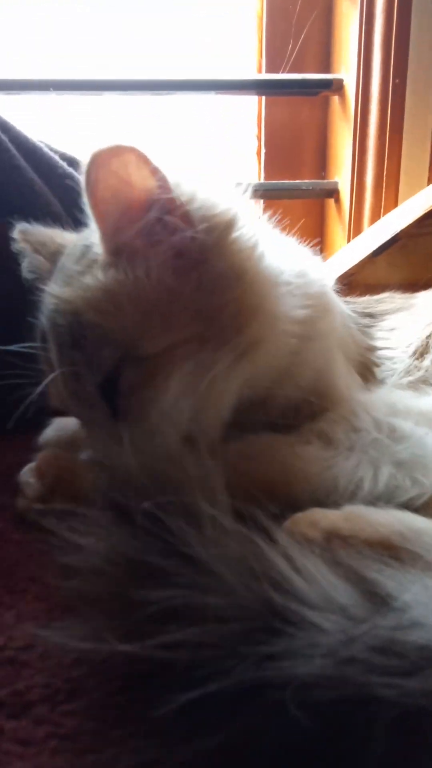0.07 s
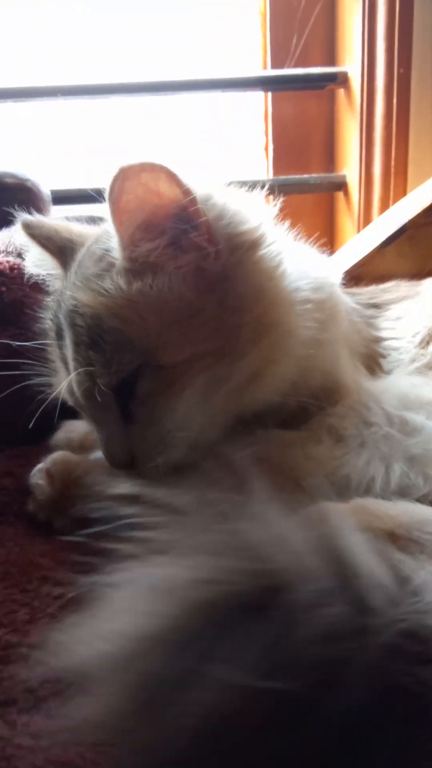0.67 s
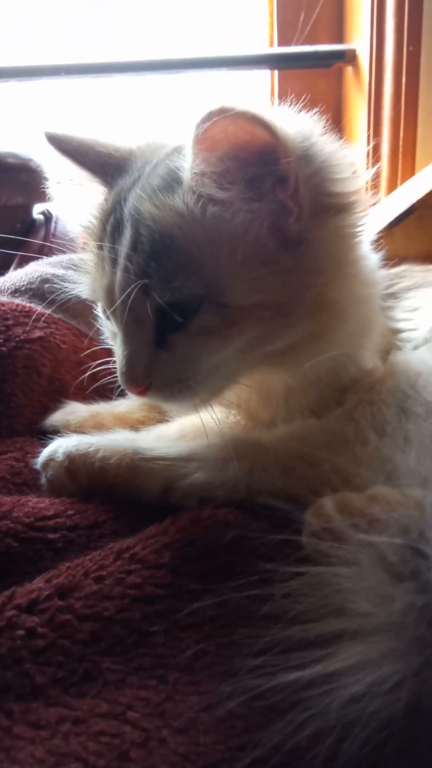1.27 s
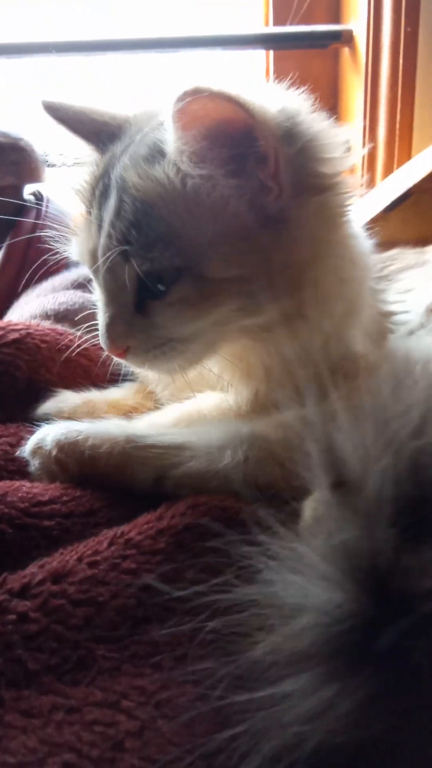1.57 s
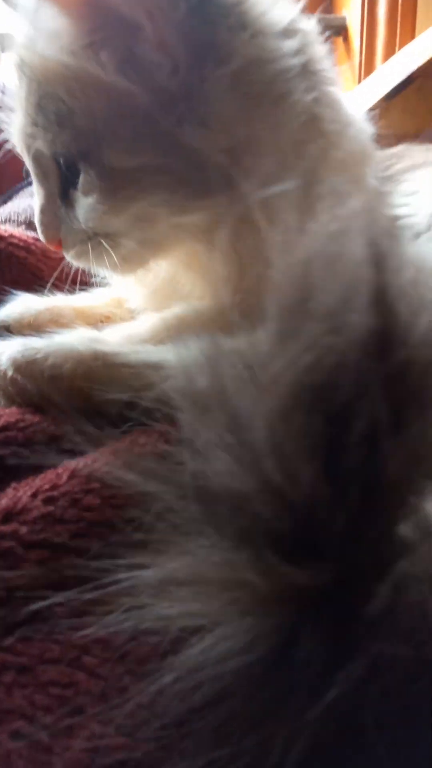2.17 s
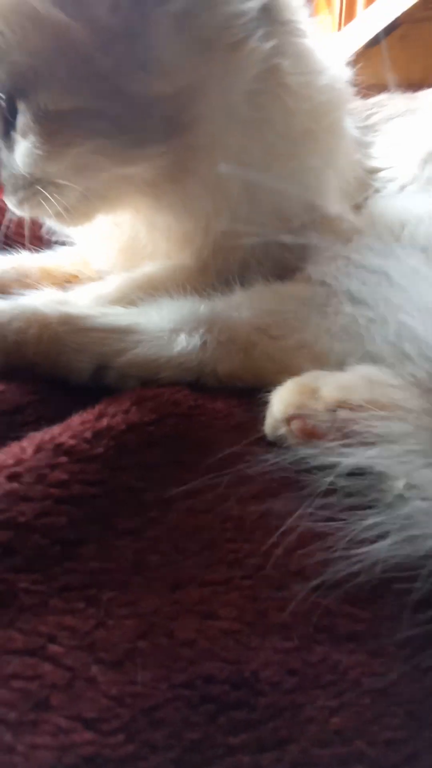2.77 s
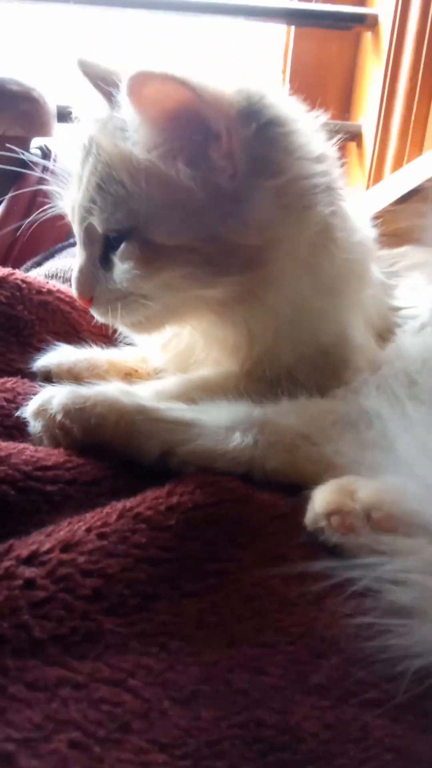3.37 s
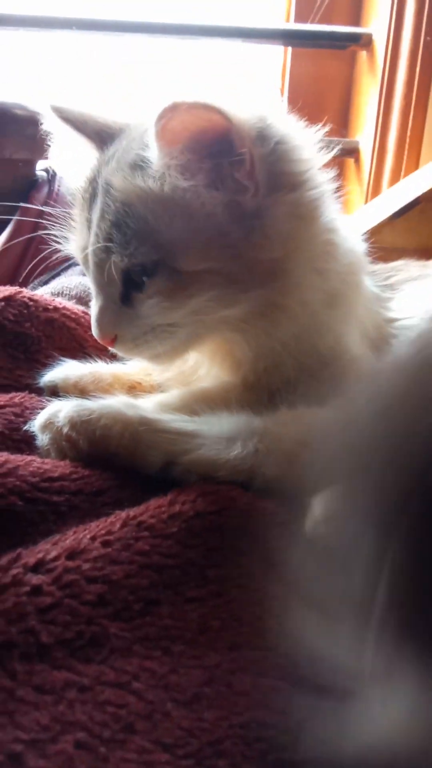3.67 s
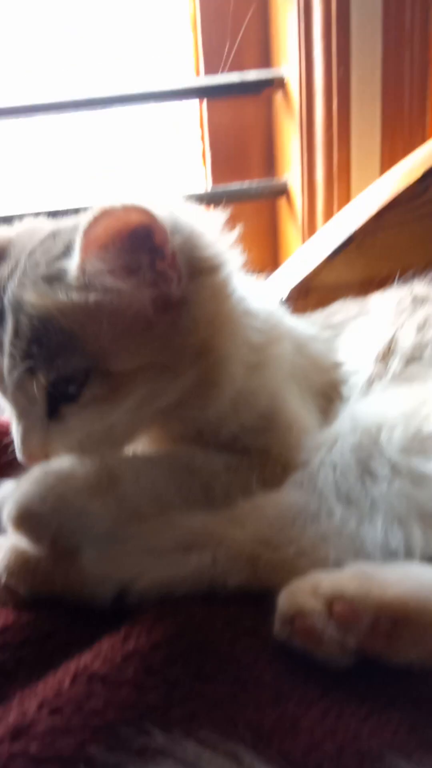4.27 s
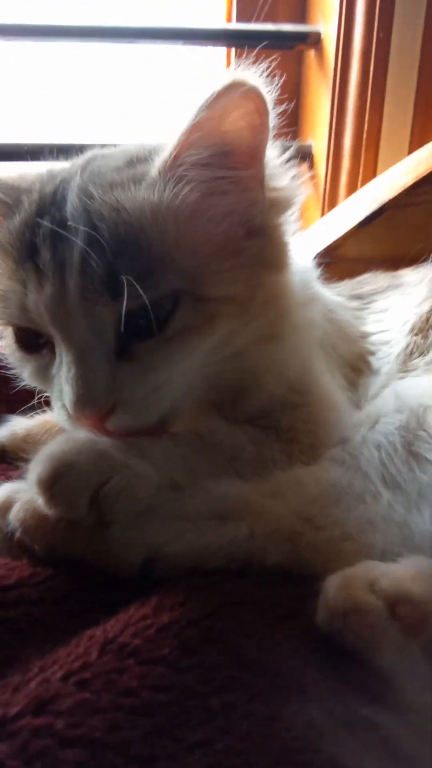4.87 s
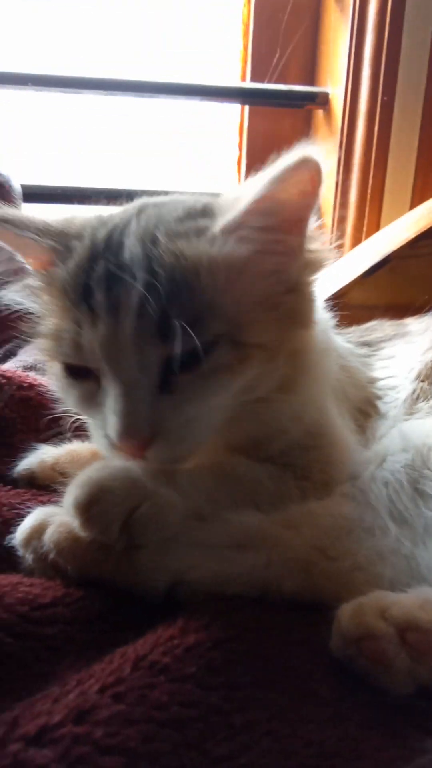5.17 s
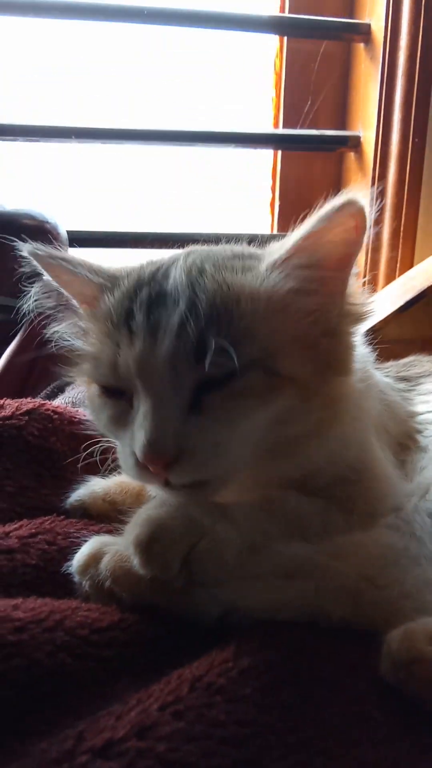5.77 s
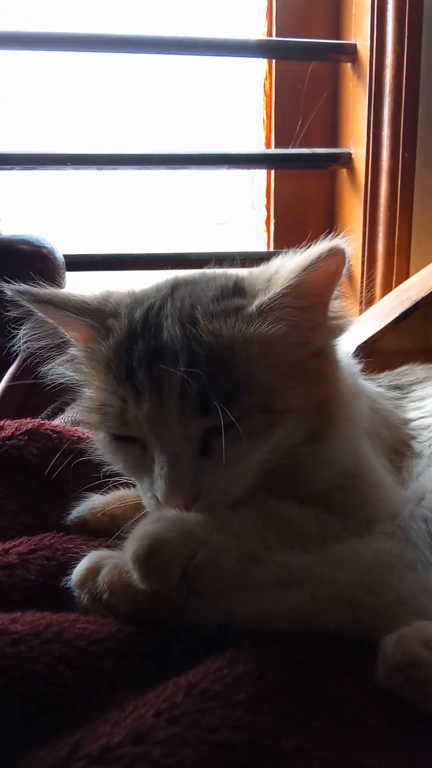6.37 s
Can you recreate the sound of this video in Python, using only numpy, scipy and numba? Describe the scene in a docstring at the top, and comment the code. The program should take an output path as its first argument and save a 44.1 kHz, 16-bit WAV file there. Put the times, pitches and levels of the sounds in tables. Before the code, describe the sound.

A kitten grooms on a fleece blanket right beside a hand-held phone in a quiet room. Its tail brushes softly over blanket and microphone with a fine, crackly hiss. The strokes grow firmer and a few hairs snap sharply. Near the end, fur drags on the phone case in a quick run of dull knocks, followed by a last faint rustle.

```python
"""A kitten grooms on a fleece blanket, right beside a hand-held phone in a quiet room.
First its tail brushes softly over blanket and phone: hairs catch and let go in swarms of tiny slips.
From about 2.4 s the strokes get firmer, and just after 4 s a few hairs snap loudly.
From about 5.4 s fur drags on the case, which sticks and slips in a run of dull knocks.
A last faint rustle closes the scene."""
import sys
import numpy as np
from scipy import signal
from scipy.fft import rfft, irfft
from scipy.io import wavfile
from scipy.ndimage import uniform_filter1d
from numba import njit

SR = 44100
rng = np.random.default_rng(int(sys.argv[2]) if len(sys.argv) > 2 else 0)


def transcribe(signal):
    """Save signal, clipped to [-1, 1], as a 16-bit WAV file at the path in sys.argv[1]."""
    frames = np.atleast_2d(signal).T
    limited = np.clip(frames, -1, 1)
    pcm = np.round(limited * 32767).astype(np.int16)
    wavfile.write(sys.argv[1], SR, pcm)


N = 283563
TIME = np.arange(N) / SR

# Tone colours. Each row: frequency in Hz, relative level in dB.
ROOM_EQ = [(20, -26), (45, -6), (70, 12.5), (100, -1.5), (300, -3.5), (900, -1.5), (3000, -14), (6000, -18),
           (12000, -39), (16000, -47)]  # low room tone
CASE_EQ = [(20, -42), (45, -10.5), (80, -2), (115, 0), (200, -2), (350, -2), (600, -7), (2000, -63.5)]  # dull rumble of the phone case
CLOTH_EQ = [(30, -39), (100, -17.5), (300, -9), (520, -1.5), (750, -0.5), (1100, -1), (1600, -3),
            (2400, -11.5), (4000, -23), (9000, -33)]  # muffled fleece and furnishings
HAIR_EQ = [(40, -67), (300, -30), (900, -16.5), (1800, 5.5), (2500, 6), (3200, 1), (4700, 3.5),
           (6200, -3.5), (7600, -11.5), (9200, -11), (12000, -24), (16000, -23)]  # bright hiss of hair shafts
TIPS_EQ = [(100, -51), (2000, -17), (5000, 2), (7500, -3), (9500, -2.5), (12000, -9), (16000, -11)]  # airy hair tips
RASP_EQ = [(60, -63), (400, -22), (1000, -6.5), (2000, 7), (2700, -3), (3500, -4), (6000, 0), (12000, -41)]  # hairs pressed hard on the case
SHIVER_EQ = [(100, -15), (500, -18), (1000, 12), (2200, -21), (3200, -35), (5000, 10), (7500, -22),
             (9500, 0), (12000, -25), (16000, -34)]  # hairs shivering around a snap
# The gap between fur and blanket rings as it opens and closes.
# Each row: time in seconds, resonance in Hz, level in dB against the plain rub.
HOLLOW_RIDE = [(0, 650, -9), (2.3, 715, -2), (2.39, 830, 13), (2.48, 920, -9), (2.84, 830, -1.5),
               (3.75, 720, -8), (5.0, 734, -5.5), (5.3, 710, -17), (6.0, 415, -1)]
# Stiffer tufts that tick now and then. Each row: pitch in Hz, relative level in dB.
TUFT_TICKS = [(1400, 3), (2300, -5.5), (4400, -3), (6000, -2), (9200, -6)]
# Fader ride on the sizzle of the hair tips. Each row: time in seconds, relative level in dB.
SIZZLE_RIDE = [(.36, 0.5), (.5, -6.5), (1.4, -4.5), (2.45, -4.5), (2.7, -18), (3.5, -4.5), (4.2, -9),
               (5.3, -13), (5.6, -35)]
# Strokes of fur over blanket and phone. Each row: firmest moment, rise and fall in seconds,
# rub level in dB, then hair hiss and case rumble in dB relative to the rub.
FUR_STROKES = [(.12, .16, 0.22, -66, -2, -9), (.37, 0.039, 0.036, -60.5, 1, -6),
               (.54, 0.08, 0.16, -66.5, -1.5, -3), (.88, 0.14, 0.058, -62.5, -5.5, -6),
               (1.0, 0.17, 0.16, -83.5, 7, 8), (1.49, 0.037, 0.019, -69.5, 2.5, -13),
               (1.61, .08, 0.22, -64.5, -0.5, -5), (1.893, 0.015, 0.025, -53.5, -9.5, 0.5),
               (2.0, .05, 0.066, -59.5, -2, -5), (1.8, 0.033, 0.15, -70, -5, -3),
               (2.22, 0.12, 0.13, -65, 2, -21), (2.404, 0.021, 0.064, -43.5, -18.5, -30),
               (2.488, 0.033, 0.033, -48, -1.5, -8), (2.57, 0.051, 0.09, -53, 0, -10),
               (2.662, 0.029, 0.015, -42.5, -15, -16), (2.82, .1, .07, -49.5, -5, -12),
               (2.893, 0.018, 0.03, -38.5, -3, -15.5), (2.982, 0.028, 0.011, -44.5, -8.5, -23),
               (3.03, .05, 0.086, -57.5, -0.5, -3), (3.173, 0.028, 0.038, -37.5, -2.5, -15),
               (3.32, 0.074, 0.075, -53.5, -3.5, -5.5), (3.6, .11, 0.059, -49.5, -5.5, -6.5),
               (3.634, 0.017, 0.014, -42, -4.5, -24), (3.76, 0.057, 0.2, -61, -2.5, 0),
               (4.047, 0.031, .03, -39, -2.5, -9), (4.112, .04, 0.039, -35.5, -2, -13),
               (4.176, 0.02, 0.015, -36.5, -5, -3), (4.205, 0.031, 0.079, -42.5, -11, -4),
               (4.409, 0.2, 0.055, -43, -13, -3.5), (4.6, 0.094, 0.038, -48, -12, -9.5),
               (4.791, 0.077, 0.1, -41, -4.5, -20), (4.915, .012, 0.03, -49.5, -6, -19),
               (4.96, 0.059, 0.14, -57, -5, -11), (5.17, 0.048, 0.1, -50.5, 0, -4),
               (5.261, 0.029, 0.029, -35.5, -.5, -12), (5.302, 0.023, 0.02, -36, -0.5, -10.5),
               (5.38, 0.048, 0.054, -50, -3, 3), (5.445, 0.052, 0.047, -40.5, 1, -20),
               (5.54, 0.055, 0.052, -47.5, -2, -20), (5.73, 0.11, 0.12, -52, -28, 3),
               (5.94, 0.0054, 0.023, -39, -9, 8.5), (6.02, 0.077, 0.068, -55, 1, -8),
               (6.127, 0.01, 0.013, -48, -6, 4.5), (6.24, 0.12, 0.068, -62.5, -16, -1),
               (6.4, 0.078, .1, -66, 1.5, -18)]
# Featured snaps of hair and tongue. Each row: start in seconds, level in dB, pitch in Hz.
ACCENT_SNAPS = [(.0713, -37, 2040), (.158, -27.5, 7760), (0.2363, -36, 5610), (0.3956, -34, 5200),
                (.8424, -29.5, 8600), (1.024, -44.5, 3580), (1.029, -40.5, 5300), (1.19, -43, 7500),
                (1.434, -49, 8000), (1.5413, -29, 5270), (1.555, -31, 7560), (1.581, -24.5, 1840),
                (1.6161, -26.5, 7500), (1.6616, -34, 7560), (1.7029, -36, 6300), (1.8136, -35, 7100),
                (1.8874, -30, 6760), (2.0589, -27.5, 7100), (2.168, -32, 5660), (2.1904, -35, 5760),
                (2.2098, -36, 5250), (2.2858, -35, 4240), (2.315, -36, 4830), (2.4256, -29, 5200),
                (2.467, -30, 4480), (2.5468, -28, 5530), (2.6751, -25.5, 3740), (2.9873, -29, 4160),
                (3.044, -32, 3860), (3.1271, -27, 4530), (3.364, -32, 5200), (3.4605, -29.5, 5670),
                (3.6251, -20, 5870), (3.6287, -23, 1900), (4.1114, -13, 2280), (4.1272, -20, 2120),
                (4.162, -16, 4240), (4.1825, -19, 2100), (4.25, -28, 5200), (4.9021, -26.5, 1940),
                (4.908, -22, 2660), (4.9129, -21.5, 1370), (4.9534, -32, 7020), (5.1423, -26.5, 5160),
                (5.2276, -17.5, 5570), (5.2569, -23, 3580), (5.291, -24, 5200), (5.358, -25, 5610),
                (5.4391, -15, 4870), (5.5954, -27.5, 2460), (6.007, -25, 4030), (6.0415, -13, 1690),
                (6.292, -41, 6800)]
# Single slips of fur on the case. Each row: start in seconds, peak in dB, starting pitch in Hz,
# decay in seconds, scrape level in dB relative to the peak.
CASE_SLIPS = [(0.517, -50, 400, .008, -20), (0.535, -48, 400, 0.0059, -8), (.724, -45, 1070, 0.0025, -28),
              (.7386, -49.5, 395, 0.02, -26), (1.635, -41.5, 537, 0.011, -25),
              (2.682, -35.5, 398, 0.0021, -24), (3.812, -47, 438, 0.012, -15),
              (4.863, -24.5, 540, 0.00083, -4.5), (4.929, -33.5, 396, .0054, -5),
              (5.4, -26, 474, 0.0018, -7), (5.4316, -22.5, 460, 0.0018, -10),
              (5.4604, -22, 470, 0.0043, -18), (5.6501, -19.5, 614, 0.0019, -24),
              (5.6578, -24, 446, 0.004, -23), (5.6973, -17, 640, .0024, -21),
              (5.726, -17.5, 616, 0.0018, -30), (5.7499, -16.5, 600, 0.0012, -25),
              (5.774, -24.5, 583, 0.0026, -16), (5.8018, -16.5, 607, 0.00086, -31),
              (5.8457, -20.5, 580, 0.0022, -19), (5.8947, -20.5, 446, 0.0052, -13.5),
              (5.9309, -12, 580, 0.00098, -14.5), (5.941, -16.5, 470, .0023, -16),
              (5.9537, -15.5, 536, 0.0014, -20), (5.9587, -17, 390, 0.0028, -17),
              (5.9684, -18, 630, 0.001, -21), (6.0201, -20, 571, .0011, -13),
              (6.117, -22.5, 574, 0.00035, -18), (6.124, -18.5, 497, .0045, -22),
              (6.1827, -18, 500, 0.0047, -19.5)]
# Soft bumps against the phone, which hold their pitch. Each row reads as in CASE_SLIPS.
CASE_BUMPS = [(1.989, -38, 315, .0085, -28.5), (3.846, -45.5, 325, 0.0046, -22),
              (4.1823, -22.5, 410, 0.0052, -1), (4.1855, -10, 770, 0.0016, -13),
              (5.8916, -18.5, 684, 0.0022, -17)]

ROOM_DB = -68.5
REST_RUB_DB, REST_HAIR_DB, REST_RUMBLE_DB = -76, -83, -80  # the resting body still stirs
MIDDLING_DB = -49.5  # hair hiss of a middling stroke
LOW_CUT_HZ, HIGH_CUT_HZ = 80.5, 16100


def undb(db):
    """Decibels to gain."""
    return 10 ** (np.asarray(db) / 20)


def noise():
    """White noise of unit power."""
    return rng.standard_normal(N)


def colour(x, eq, size=2048):
    """Shape x with an EQ curve, as a minimum-phase filter of unit energy."""
    hz, db = np.transpose(eq)
    grid = np.maximum(np.fft.rfftfreq(size, 1 / SR), 1)
    gain = undb(np.interp(np.log(grid), np.log(hz), db))
    cepstrum = irfft(np.log(gain))
    cepstrum[1:size // 2] *= 2
    cepstrum[size // 2 + 1:] = 0
    impulse = irfft(np.exp(rfft(cepstrum)))
    return signal.oaconvolve(x, impulse / np.linalg.norm(impulse))[:len(x)]


def wander(per_s):
    """Smooth random drift with a spread near 1."""
    hold = max(int(SR / per_s), 1)
    steps = np.repeat(rng.standard_normal(N // hold + 1), hold)
    return uniform_filter1d(steps, hold)[:N] * np.sqrt(3 / 2)


def automation(table):
    """The columns of a table as sample-by-sample controls."""
    times, *columns = np.transpose(table)
    return [np.interp(TIME, times, column) for column in columns]


def add(out, start_s, sound):
    """Drop a sound onto the track at start_s."""
    i = max(int(start_s * SR), 0)
    out[i:i + len(sound)] += sound[:max(N - i, 0)]


def room_tone():
    """The quiet, low bed under everything."""
    return undb(ROOM_DB) * colour(noise(), ROOM_EQ)


def reflections(x, t60_s=0.083, wet_db=-27, size=12000):
    """The faint, dull answer of a small furnished room."""
    t = np.arange(size) / SR
    tail = colour(rng.standard_normal(size), CLOTH_EQ) * undb(-60 * t / t60_s)
    return undb(wet_db) * signal.fftconvolve(x, tail / np.linalg.norm(tail))[:N]


def case_rumble():
    """The phone case rumbles unevenly under the touch."""
    return colour(noise(), CASE_EQ) * undb(1.34 * wander(per_s=25))


def slips(per_s, spread_db):
    """A unit-power swarm of fibres letting go: many small, few large."""
    chance = np.clip(per_s / SR, 1e-5, 1) * np.ones(N)
    draw, coin = rng.random((2, N))
    hit = draw < chance
    # sizes are exponential in dB, up to what one fibre can hold
    strain = np.minimum(-np.log(draw[hit] / chance[hit] + 1e-12), 3.5)
    size = undb(spread_db * strain)
    swarm = np.zeros(N)
    swarm[hit] = np.sign(coin[hit] - .5) * size / np.sqrt(np.mean(size ** 2) * chance[hit])
    return swarm


def fibre_ping(hz, decay_cycles, size=600):
    """A struck fibre: a fast-dying sine with a peak of 1."""
    cycles = min(hz, .4 * SR) * np.arange(size) / SR
    wave = np.sin(2 * np.pi * cycles) * np.exp(-cycles / decay_cycles)
    return wave / np.abs(wave).max()


@njit
def resonate(x, hz, width_hz):
    """Swept band-pass; white noise keeps its power."""
    y, band, low = np.empty(len(x)), 0., 0.
    for i in range(len(x)):
        tuning, damping = np.tan(np.pi * hz[i] / SR), width_hz / hz[i]
        swing = (band + tuning * (x[i] - low)) / (1 + tuning * (tuning + damping))
        band = 2 * swing - band
        low += 2 * tuning * swing
        y[i] = damping * swing
    return y * np.sqrt(SR / (np.pi * width_hz))


def blanket(firmness, width_hz=215.0):
    """The fleece pile rubs in dense dull slips, coloured by the hollow under the fur."""
    hollow_hz, hollow_db = automation(HOLLOW_RIDE)
    grains = slips(6000, spread_db=2.5) + undb(-7.5) * slips(900 * firmness, spread_db=8)
    pile = colour(grains, CLOTH_EQ)
    hollow = resonate(slips(8000, spread_db=0.5), hollow_hz, width_hz)
    # fleece soaks up the treble
    hollow = signal.sosfilt(signal.butter(2, 2200, fs=SR, output="sos"), hollow)
    return (pile + undb(hollow_db) * hollow) / np.hypot(1, undb(hollow_db))


def tufts(per_s):
    """Tufts of several stiffnesses tick independently, each at its own pitch."""
    ticks = np.zeros(N)
    for hz, db in TUFT_TICKS:
        tick = fibre_ping(hz, decay_cycles=1)
        ticks += undb(db) * signal.oaconvolve(slips(per_s, spread_db=5), tick / np.linalg.norm(tick))[:N]
    return ticks


def fur(firmness):
    """Hairs slide with a hiss, catch with a crackle, and their tips add a thin sizzle."""
    sizzle_db, = automation(SIZZLE_RIDE)
    shafts = colour(undb(-3) * noise() + undb(-4) * slips(1800 * firmness, spread_db=7.5), HAIR_EQ)
    tips = undb(-5.5) * noise() + undb(-1) * slips(1500 * np.sqrt(firmness), spread_db=6.5)
    sizzle = undb(sizzle_db + 2) * colour(tips, TIPS_EQ)
    # only a firm sweep bends whole bundles, which rasp in coarse grains
    rasp = colour(slips(900, spread_db=1.5), RASP_EQ) * firmness / (firmness + 3.6)
    return shafts + undb(-7.5) * tufts(350 * firmness) + sizzle + rasp


def strokes(rise_shape=2.12, fall_shape=3, hair_growth=1.15):
    """Fader rides in dB for rub, hair and rumble: each stroke swells and fades, and their powers add."""
    power = undb([REST_RUB_DB, REST_HAIR_DB, REST_RUMBLE_DB])[:, None] ** 2 * np.ones(N)
    for peak_s, rise_s, fall_s, rub_db, hiss_db, rumble_db in FUR_STROKES:
        near = slice(*np.searchsorted(TIME, [peak_s - 3 * rise_s, peak_s + 3 * fall_s]))
        t = TIME[near] - peak_s
        # a shape of 2 is a bell, more is squarer
        swell = np.exp(-np.where(t < 0, abs(t / rise_s) ** rise_shape, abs(t / fall_s) ** fall_shape))
        peak_power = undb([rub_db, rub_db + hiss_db, rub_db + rumble_db])[:, None] ** 2
        # the hiss grows faster than the rub, so a stroke brightens as it firms
        power[:, near] += peak_power * [swell, swell ** hair_growth, swell]
    return 10 * np.log10(power)


def rustle(rub_db, hair_db, rumble_db):
    """Fur and blanket rub together over the rumble of the case."""
    grip = undb(0.63 * wander(per_s=90))  # the contact tightens and loosens
    # a firmer sweep frees more hairs a second, so lone ticks merge into a hiss
    firmness = undb(.8 * (hair_db - MIDDLING_DB))
    rumble = undb(rumble_db) * case_rumble()
    rub = undb(rub_db) * blanket(firmness)
    hiss = undb(hair_db + 1.5) * fur(firmness)
    return grip * (rub + hiss + rumble)


def stray_snaps(hair_db, per_s=16, base_db=-40, db_per_db=0.64, hz=6000, count=160):
    """Lesser snaps at random moments, louder in a firm stroke; rows as in ACCENT_SNAPS."""
    times = np.cumsum(rng.exponential(1 / per_s, count))
    push_db = np.interp(times, TIME, hair_db) - MIDDLING_DB
    levels = base_db + db_per_db * push_db + 3 * rng.standard_normal(count)
    pitches = hz * 2 ** (0.1 * rng.standard_normal(count))
    return [row for row in zip(times, levels, pitches) if row[0] < TIME[-1]]


def snaps(hair_db, shiver_db=-23, shiver_s=0.003, size=600):
    """A hair lets go: one sharp swing, with a brief shiver of its neighbours."""
    swings, shivers = np.zeros((2, N))
    t = np.arange(size) / SR
    cues = ACCENT_SNAPS + stray_snaps(hair_db)
    for (start_s, db, hz), grit in zip(cues, rng.standard_normal((N // size, size))):
        add(swings, start_s, undb(db + 2) * fibre_ping(hz, decay_cycles=0.59, size=size))
        add(shivers, start_s, undb(db + shiver_db) * grit * np.exp(-t / shiver_s))
    return swings + colour(shivers, SHIVER_EQ)


def judder(start_s=5.4968, length_s=.143, gap_s=.0182, slowing=0.018, jitter_s=0.00066,
           first_db=-22, fade_db_per_s=38, hz=470, decay_s=0.0044, scrape_db=-14, count=12):
    """Stick and slip under a steady drag, slowing and weakening; rows as in CASE_SLIPS."""
    gaps = gap_s * (1 + slowing) ** np.arange(count)
    cues = []
    for t, (late, softer, looser) in zip(np.cumsum(gaps) - gaps, rng.standard_normal((count, 3))):
        if t < length_s:
            db = first_db - fade_db_per_s * t - 0.2 * softer
            ring_s = decay_s * np.exp(0.48 * looser)
            cues.append((start_s + t + jitter_s * late, db, hz, ring_s, scrape_db))
    return cues


def knocks(slip_settle=0.2, relax_s=0.0021, attack_s=0.00015, scrape_s=0.0016, tick_db=8, size=2200):
    """Each slip or bump jolts the case into a damped swing, topped with a tick and a short scrape."""
    swings, scrapes = np.zeros((2, N))
    t = np.arange(size) / SR
    # a slip's pitch sinks to a fraction of its start as the contact slackens; a bump's holds
    jolts = [(*row, slip_settle) for row in CASE_SLIPS + judder()] + [(*row, 1) for row in CASE_BUMPS]
    for start_s, db, hz, decay_s, scrape_db, settle in jolts:
        pitch = hz * (settle + (1 - settle) * np.exp(-t / relax_s))
        envelope = np.exp(-t / decay_s) * (1 - np.exp(-t / attack_s))
        swing = np.sin(2 * np.pi * np.cumsum(pitch) / SR) * envelope
        add(swings, start_s, undb(db) * swing / np.abs(swing).max())
        scrape = rng.standard_normal(size) * np.exp(-t / scrape_s)
        tick = undb(tick_db) * (t == 0)
        add(scrapes, start_s, undb(db + scrape_db) * (scrape + tick))
    return swings + colour(scrapes, HAIR_EQ)


def scene():
    """Rustle and snaps sound in the room; the knocks reach the microphone through the case."""
    rub_db, hair_db, rumble_db = strokes()
    airborne = rustle(rub_db, hair_db, rumble_db) + snaps(hair_db)
    top_octave = signal.sosfiltfilt(signal.butter(4, 10800, "high", fs=SR, output="sos"), airborne)
    airborne -= 0.69 * top_octave  # the microphone port dulls the top
    return (airborne + reflections(airborne) + knocks() + room_tone())[None]


def record(dry):
    """The phone cuts the deep bass and the top."""
    thin = signal.sosfilt(signal.butter(3, LOW_CUT_HZ, "high", fs=SR, output="sos"), dry)
    return signal.sosfilt(signal.ellip(8, .2, 70, HIGH_CUT_HZ, fs=SR, output="sos"), thin)


dry = scene()
out = record(dry)
transcribe(out)
```